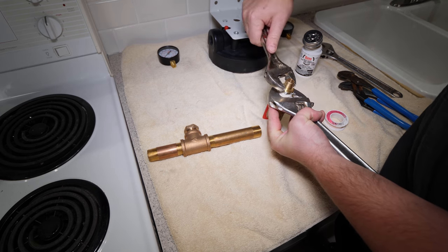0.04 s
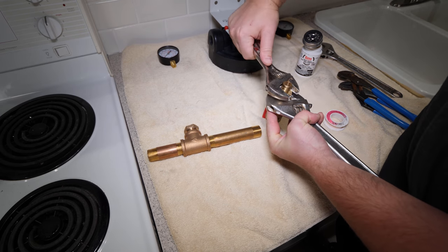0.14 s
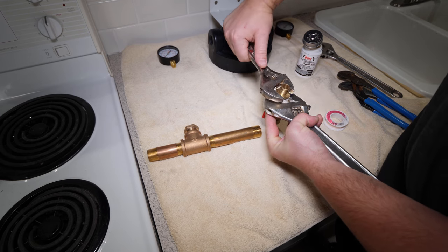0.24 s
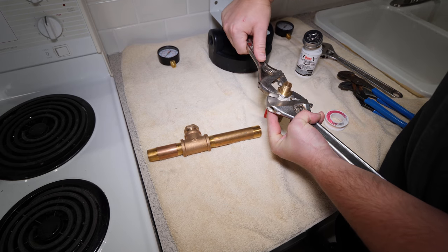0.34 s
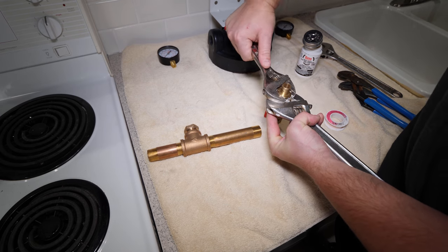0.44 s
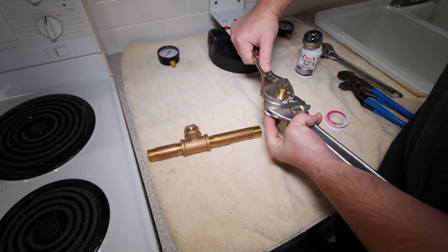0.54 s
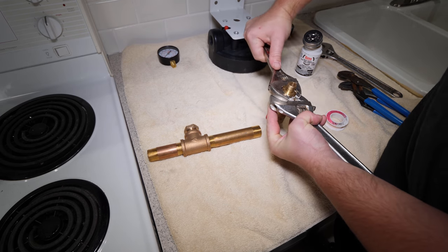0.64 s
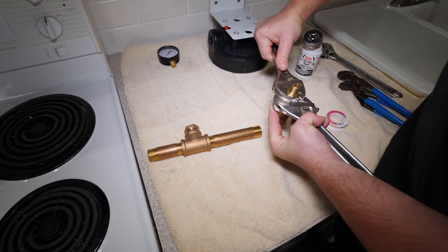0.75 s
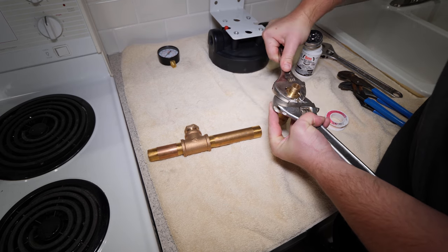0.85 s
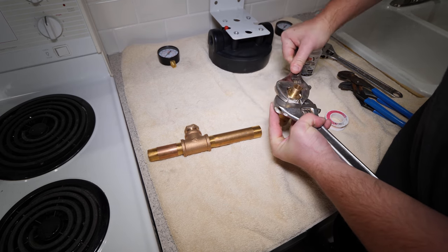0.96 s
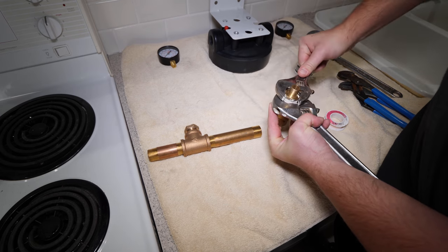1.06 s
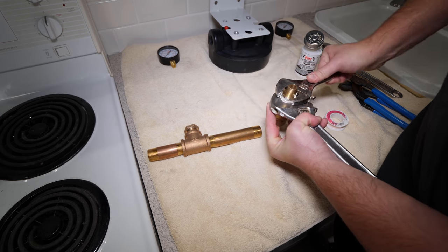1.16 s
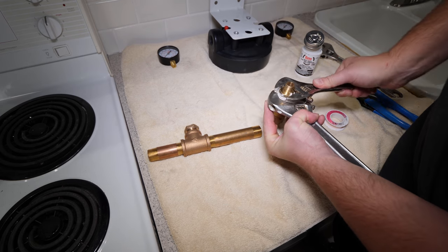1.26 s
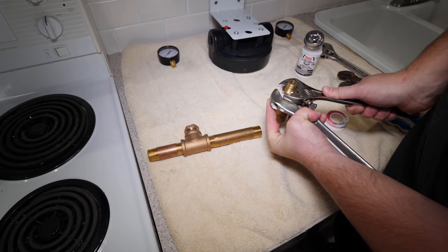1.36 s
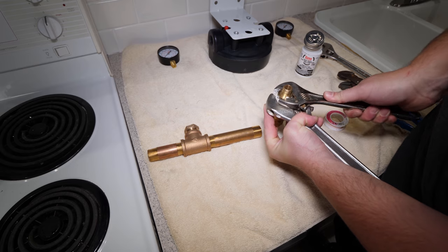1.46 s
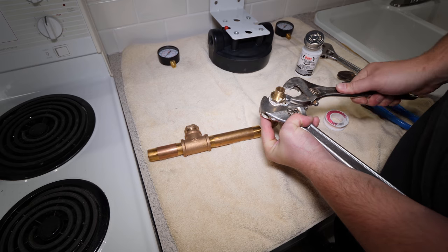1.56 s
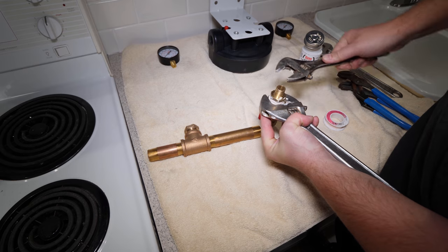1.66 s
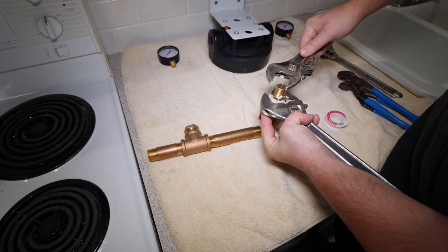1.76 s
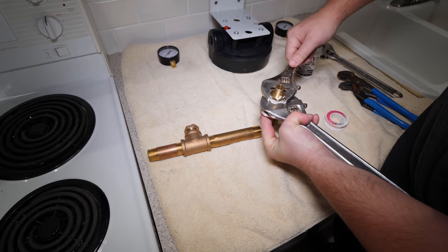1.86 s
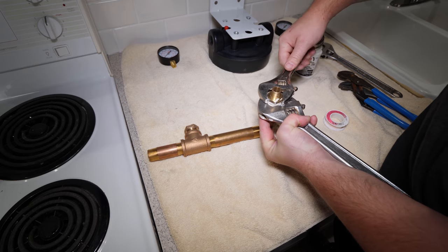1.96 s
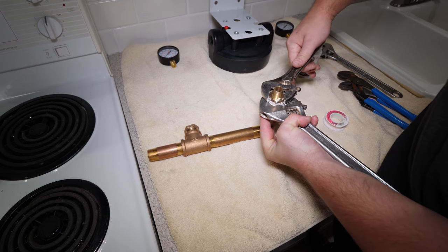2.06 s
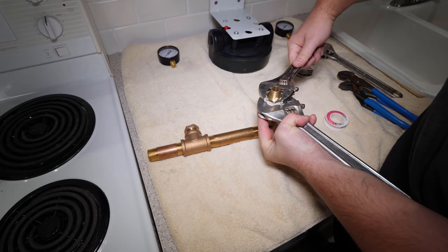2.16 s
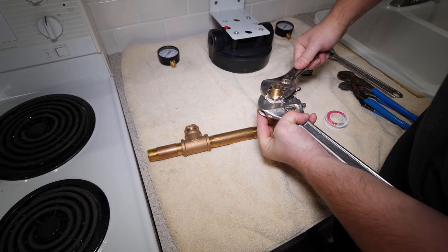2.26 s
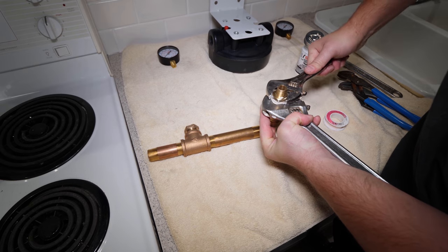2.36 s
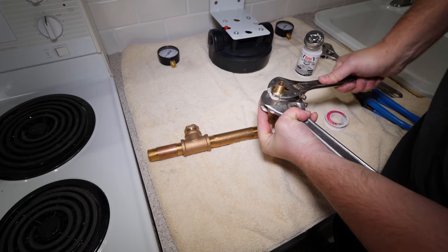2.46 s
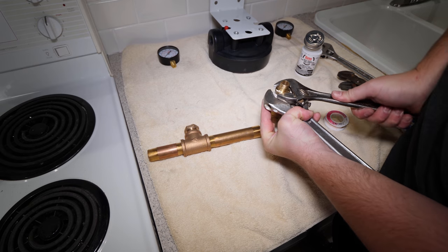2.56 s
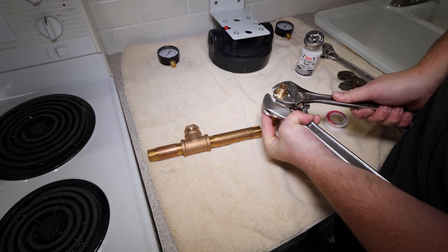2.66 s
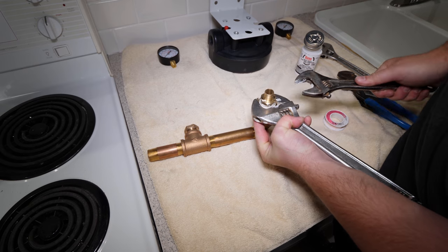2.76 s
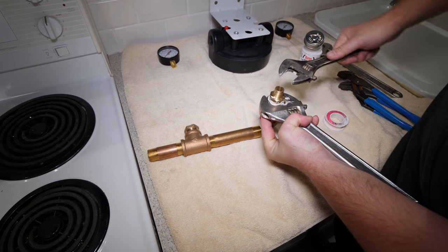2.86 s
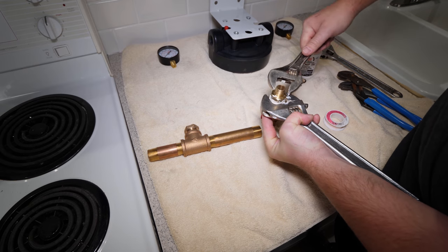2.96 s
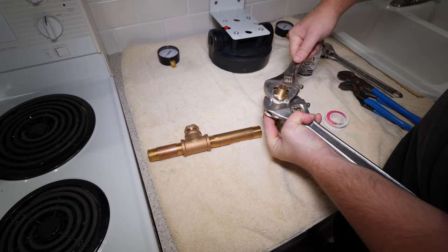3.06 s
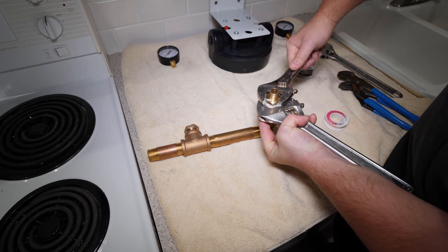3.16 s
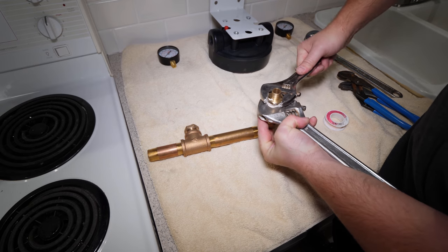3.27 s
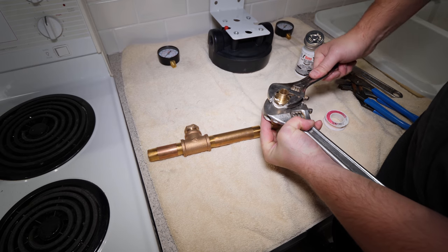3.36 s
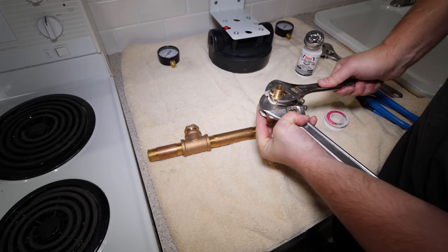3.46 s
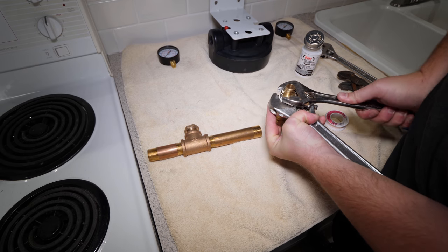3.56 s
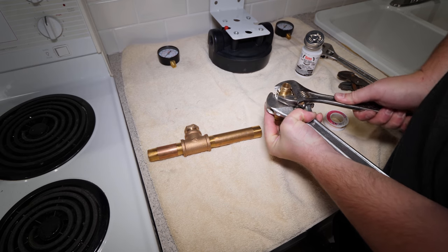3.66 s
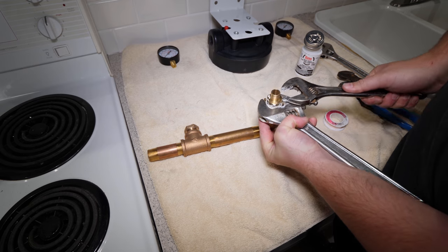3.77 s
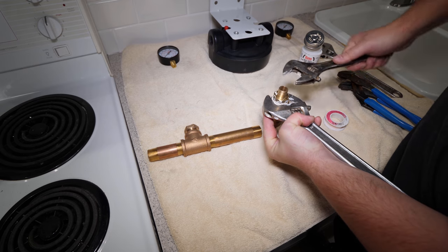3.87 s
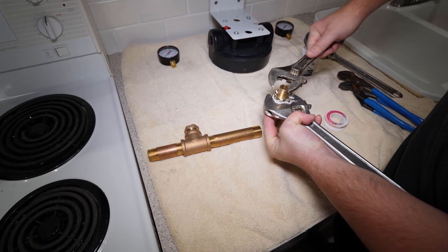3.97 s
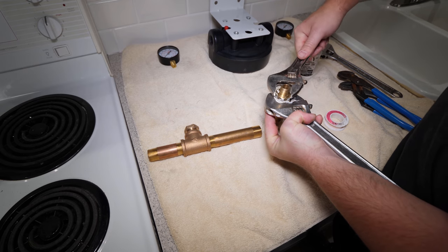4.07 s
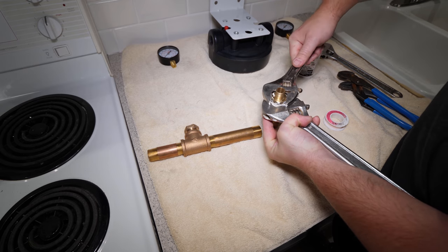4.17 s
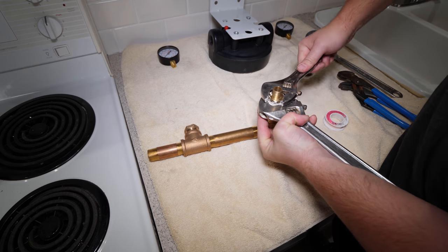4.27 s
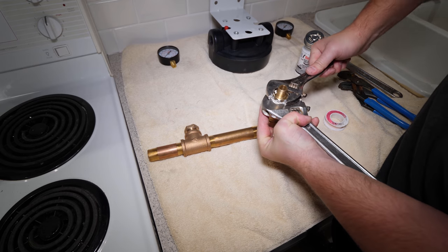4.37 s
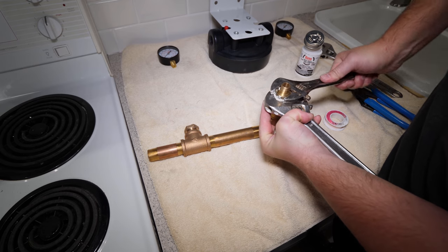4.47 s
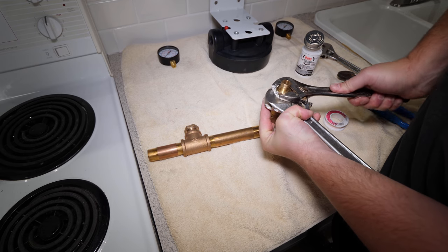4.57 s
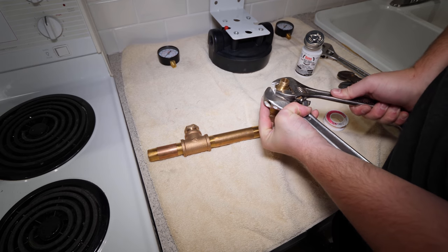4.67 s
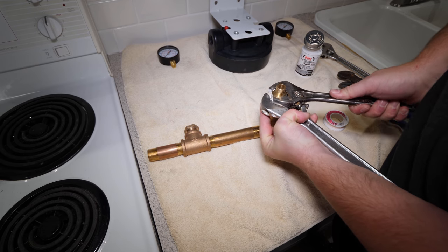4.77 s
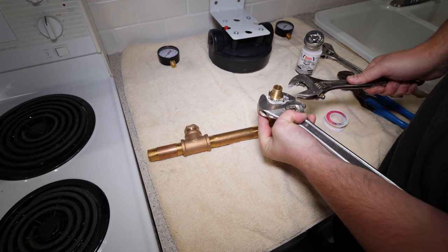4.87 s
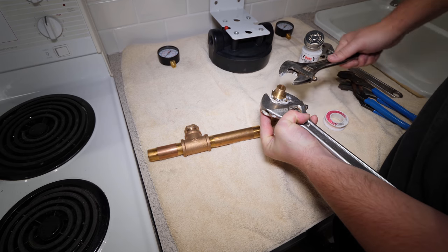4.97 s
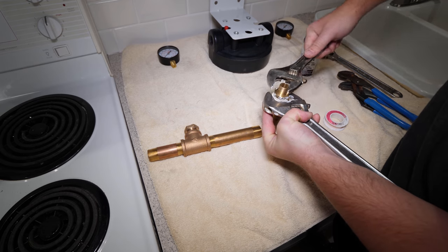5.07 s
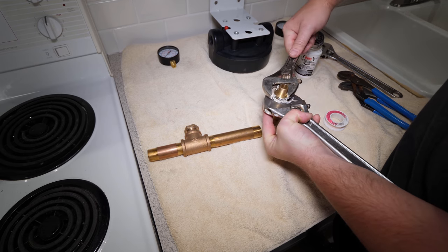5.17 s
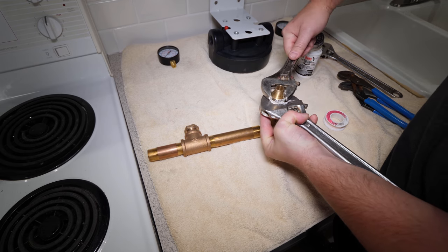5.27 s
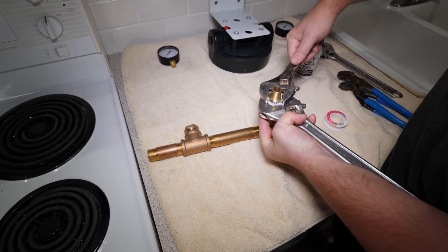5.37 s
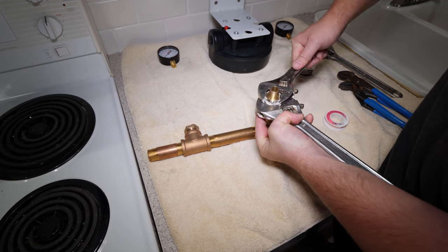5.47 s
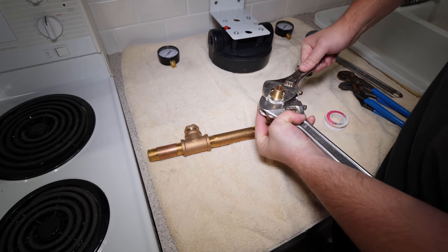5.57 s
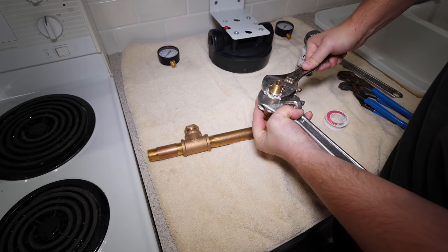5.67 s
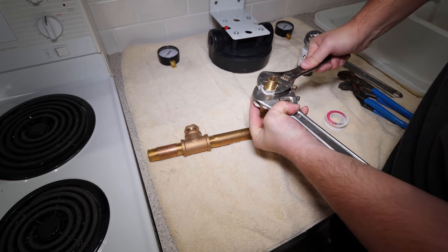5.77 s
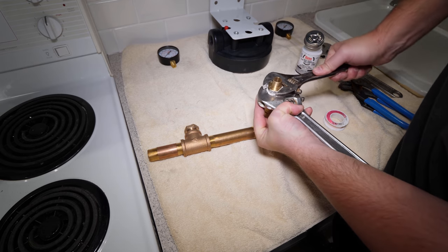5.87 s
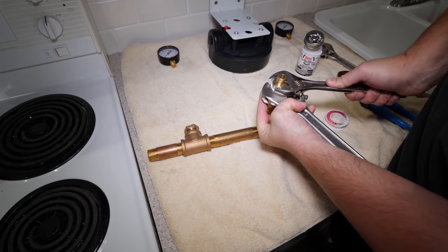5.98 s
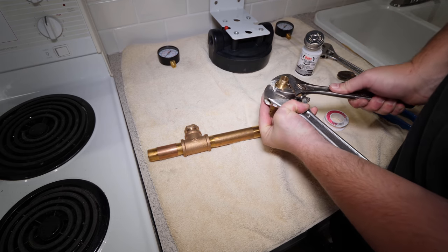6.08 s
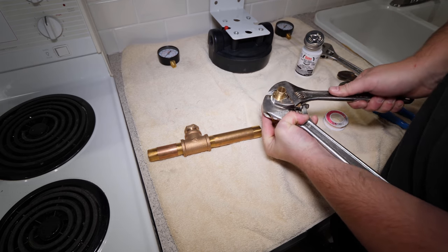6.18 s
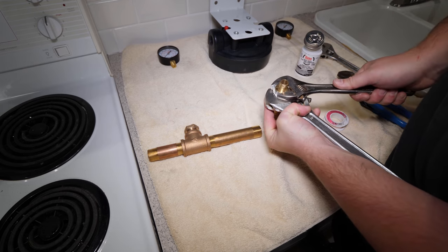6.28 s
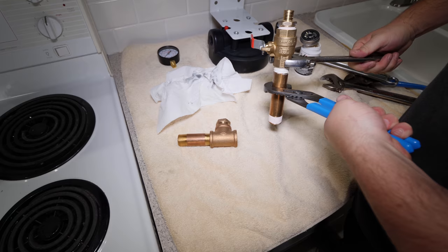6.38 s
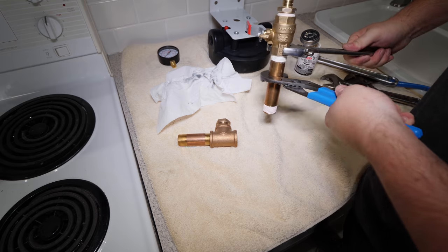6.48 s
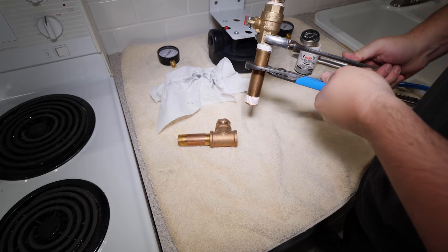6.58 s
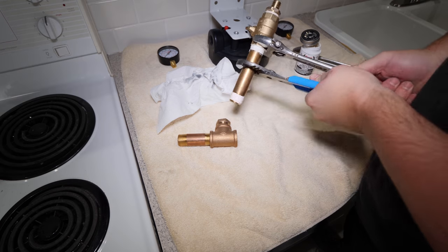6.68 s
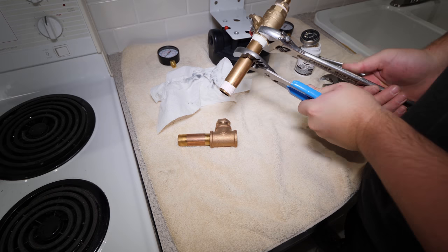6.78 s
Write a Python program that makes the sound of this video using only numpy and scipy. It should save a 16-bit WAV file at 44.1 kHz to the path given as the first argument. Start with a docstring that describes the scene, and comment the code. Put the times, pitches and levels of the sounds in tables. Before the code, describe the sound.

Close stereo microphone in a small tiled kitchen. A steel wrench is seated on a brass fitting held in pliers, turned and lifted off again and again. Clusters of hard, short clacks and bright clicks alternate with near-quiet moments of faint metal rubbing. Dull bumps through a towel and hollow knocks accompany them. The loudest hits bring a quick, squeezed room echo. Soft room hiss and a low hum continue beneath, and the last seconds are almost still.

```python
"""An adjustable wrench is set on a brass fitting held in pliers over a towel, turned, and lifted off, again and again.
Each touch of jaw on brass is a short noise crack that rings the hand-damped steel as dying tones; the turns are
tiny slips feeding drifting resonances. Bumps, a humming handle and one free clink go with them in a tiled kitchen.
Room tone and a low drone lie behind. A close stereo microphone with a fast limiter squeezes the hardest blows,
so their echo swells just after them; some blows add a short overload tick."""
import sys
import numpy as np
from scipy import signal
from scipy.io import wavfile
from scipy.ndimage import uniform_filter1d

SR = 44100
rng = np.random.default_rng(int(sys.argv[2]) if len(sys.argv) > 2 else 0)


def unload_audio(sound):
    """Save the sound as a 16-bit wav file, at the path given as the first command line argument."""
    columns = np.transpose(np.atleast_2d(sound))
    # keep every value between -1 and 1, then stretch to whole-number steps
    steps = np.round(np.clip(columns, -1, 1) * 32767)
    wavfile.write(sys.argv[1], SR, steps.astype(np.int16))


N = 301203  # length in samples

# The loose sliding jaw. Each row: mode in Hz, relative level in dB, 60 dB decay in s.
JAW_MODES = [(2570, 0.5, 0.013), (2655, -0.5, 0.013)]


def gain_of(db):
    """Decibels to a factor."""
    return 10 ** (np.asarray(db) / 20)


def evened(x):
    """Scales to rms 1."""
    return x / np.sqrt(np.mean(x ** 2) + 1e-20)


def peaked(x):
    """Scales each row to peak 1."""
    return x / abs(x).max(-1, keepdims=True)


def read(points, hz):
    """Reads a curve over frequency on a log axis."""
    f, value = np.transpose(points)
    return np.interp(np.log(hz + 1), np.log(f + 1), value)


def add(mix, s, sound):
    """Mixes a sound in at a time in seconds."""
    part = mix[round(s * SR):][:len(sound)]
    part += sound[:len(part)]


def band(x, lo_hz, hi_hz):
    """Causal band-pass."""
    edges = [lo_hz, min(hi_hz, SR / 2.1)]
    return signal.sosfilt(signal.butter(N=2, Wn=edges, btype="band", fs=SR, output="sos"), x)


def resonate(x, hz, width):
    """A resonance that may glide: shifts the curve hz down to zero, smooths, and shifts back."""
    turn = np.exp(2j * np.pi * np.cumsum(hz * np.ones(len(x))) / SR)
    r = np.exp(-np.pi * width / SR)
    return 2 * (turn * signal.lfilter([1 - r], [1, -r], x / turn)).real


def rings(modes, t, share_db, chance, detune=0.026):
    """Dying tones; each new grip shifts them a little and starts them in another phase."""
    hz, db, t60 = np.transpose(modes)[:, :, None]
    shift, phase = chance[:, :len(modes), None]
    tones = np.sin(2 * np.pi * (hz * (1 + detune * (shift - .5)) * t + phase))
    dying = gain_of(db + share_db - 60 * t / t60) * tones
    return peaked(dying.sum(0) * np.minimum(t / 0.00016, 1))


def air():
    """Room tone: stereo noise shaped in short spectra, with patches of level drifting over time and pitch."""
    # Room tone spectrum. Each row: Hz, relative density in dB per Hz.
    spectrum = [(35, -88.5), (60, -53.5), (246, -17.5), (403, -12.5), (659, -9.5), (777, -10.5), (983, -14),
                (1370, -22), (1500, -16.5), (4120, -23), (14300, -27), (16500, -32)]
    # Likeness of the two sides. Each row: Hz, correlation from 0 to 1.
    likeness = [(100, 1), (900, 0.97), (3800, 0.1), (15000, 0.95)]
    frames, hz = N // 256 + 5, np.fft.rfftfreq(1024, 1 / SR)
    a, b, c, d, patches = rng.standard_normal((frames, 513, 5)).T
    patches = evened(uniform_filter1d(uniform_filter1d(patches, 12, 0), 14, 1))
    same = np.clip(read(likeness, hz), -1, 1)[:, None]
    left = a + 1j * b
    right = same * left + np.sqrt(1 - same ** 2) * (c + 1j * d)
    z = np.array([left, right]) * gain_of(read(spectrum, hz)[:, None] + 1.5 * patches)
    return gain_of(-68) * evened(signal.istft(z, nperseg=1024, noverlap=768)[1][:, :N])


def drone():
    """A steady appliance drone: noise through one low resonance."""
    # The drone: Hz, width in Hz, level in dB.
    hz, width, db = (180, 24, -82)
    return gain_of(db) * evened(resonate(rng.standard_normal(N), hz, width))


def kitchen(x):
    """Sparse reflections of random sign that build up, each band dying at its own speed; mostly common to both sides."""
    # Decay of the room. Each row: Hz, 60 dB decay in s.
    decay = [(250, 0.51), (1000, 0.64), (3000, 0.38), (8000, 0.44), (15000, 0.14)]
    wide, build_s = 0.31, 0.00091
    taps = np.zeros((2, 26000))
    at = np.arange(180, 25980, 20) + rng.integers(0, 20, (2, 1290))  # one in every 20 samples
    np.put_along_axis(taps, at, rng.choice([-1., 1.], at.shape), 1)
    hz, t, z = signal.stft(taps, SR, nperseg=256)
    z *= gain_of(-60 * t / read(decay, hz)[:, None]) * (1 - np.exp(-t / build_s))
    mid, side = signal.istft(z, SR, nperseg=256)[1]
    tail = np.array([mid + wide * side, mid - wide * side]) / np.linalg.norm(mid)
    return signal.oaconvolve(x[None], tail, axes=1)[:, :N]


def press():
    """Dull bumps through the towel: low bands of dying noise."""
    # Hands and tools bumping the padded counter. Each row: start in seconds, level in dB.
    thumps = [(0.053, -50), (0.139, -35.5), (0.293, -41.5), (0.445, -40.5), (0.598, -53), (0.972, -56),
              (1.982, -49), (2.027, -45.5), (2.506, -54), (2.737, -49.5), (3.119, -45), (3.215, -50),
              (3.296, -56.5), (4.26, -44), (4.841, -59), (5.189, -50), (5.278, -53), (5.438, -52),
              (6.194, -61)]
    mix, t = np.zeros(N), np.arange(round(.3 * SR)) / SR
    noise = rng.standard_normal((len(thumps), len(t)))
    bumps = noise * gain_of(-60 * t / 0.1) * np.minimum(t / 0.0075, 1)
    for (s, db), bump in zip(thumps, peaked(band(band(bumps, 160, 360), 120, 420))):
        add(mix, s, gain_of(db) * bump)
    return mix


def handle():
    """The long handle flexes when knocked: a soft tap excites a broad low resonance over a rough scuff."""
    # Knocks on the handle, pitched by the grip. Each row: start in seconds, level in dB, Hz.
    knocks = [(0.055, -51, 620), (0.1, -49, 624), (0.19, -45, 608), (0.28, -46, 633), (0.322, -31.5, 637),
              (0.336, -29.5, 600), (0.455, -44, 616), (0.523, -44, 652), (0.856, -47, 670),
              (0.958, -55.5, 606), (2.028, -47, 620)]
    # The handle: width in Hz of the first of two resonances, 60 dB decay of the tap in s.
    width, t60 = (82, 0.087)
    mix, t = np.zeros(N), np.arange(round(.2 * SR)) / SR
    for s, db, hz in knocks:
        scuff = rng.standard_normal(len(t)) * gain_of(-60 * t / t60) * np.minimum(t / 0.0019, 1)
        hum = peaked(resonate(resonate(scuff, hz, width), hz, 2 * width))
        rough = peaked(band(scuff, 180, 3000))
        add(mix, s, gain_of(db) * peaked(hum + 0.28 * rough))
    return mix


def rock():
    """The fitting rocks in the pliers with a short hollow knock: one dying low tone each."""
    # Rocking knocks. Each row: start in seconds, level in dB, Hz.
    hollow = [(0.356, -32.5, 800), (2.285, -42.5, 923), (4.019, -35, 890), (5.276, -39.5, 940),
              (6.711, -54.5, 965)]
    mix, t = np.zeros(N), np.arange(round(0.055 * SR)) / SR
    for s, db, hz in hollow:
        tone = np.sin(2 * np.pi * hz * t) * np.minimum(t / 0.00064, 1)
        add(mix, s, gain_of(db - 60 * t / 0.032) * tone)
    return mix


def rattle():
    """Small uneven taps keep the loose jaw ringing while the wrench is carried over."""
    # Rattles. Each row: start in seconds, end of the taps in seconds, level in dB.
    spells = [(0.094, 0.17, -51), (5.121, 5.159, -51), (5.208, 5.297, -56)]
    mix, t = np.zeros(N), np.arange(round(0.031 * SR)) / SR
    for start, end, db in spells:
        count = round((end - start) * SR)
        hits = rng.random(count) < 900 / SR  # about 900 taps a second
        taps = rng.standard_normal(count) * hits * signal.windows.tukey(count, .5)
        ring = rings(JAW_MODES, t, 0, rng.random((2, len(JAW_MODES))))
        add(mix, start, gain_of(db) * evened(signal.fftconvolve(taps, ring)))
    return mix


def clink():
    """The wrench slips off and rings freely, once: clear tones with a rough fringe, each dying at its own speed."""
    # The clink: start in seconds, level in dB.
    start, clink_db = (1.076, -16)
    # The free wrench. Each row: mode in Hz, relative level in dB, 60 dB decay in s.
    modes = [(2190, -6, 0.018), (4060, -10, .025), (4440, 3, 0.024), (5030, -27, 0.9), (5100, -6, .022),
             (5400, -6, 0.025), (5775, -2, 0.028), (6280, -7, .025), (7200, -10, 0.03), (7760, -6, 0.035),
             (7960, -8, 0.03), (11390, -12, 0.03), (14020, -11, 0.035)]
    blur_hz = 130  # the loose parts buzz, so each mode also sounds as a rough band
    mix, t = np.zeros(N), np.arange(round(.5 * SR)) / SR
    buzz = rng.standard_normal((len(modes), len(t) + 2000))  # 2000 samples let the resonances settle
    fringe = np.zeros(len(t))
    for noise, (hz, db, t60) in zip(buzz, modes):
        rough = evened(resonate(resonate(noise, hz, blur_hz), hz, blur_hz))[-len(t):]
        fringe += rough * gain_of(db - 60 * t / t60)
    fringe = peaked(fringe * np.minimum(t / 0.00045, 1))
    clean = rings(modes, t, 0, rng.random((2, len(modes))), detune=0)
    add(mix, start, gain_of(clink_db) * peaked(clean + 0.6 * fringe))
    return mix


def slide():
    """Dense tiny slips of steel on brass feed resonances that drift as the wrench turns."""
    # Turns, jaws rubbing on brass. Each row: start, hardest moment and end in seconds, level in dB,
    # Hz of the leading resonance at the start, and from the hardest moment on.
    turns = [(0.05, 0.06, 0.33, -55.5, 2600, 2620), (2.406, 2.498, 2.62, -57, 3800, 3800),
             (2.764, 2.822, 2.9, -67, 2630, 3100), (3.419, 3.459, 3.52, -53, 3160, 4180),
             (3.469, 3.526, 3.65, -53.5, 4090, 4130), (4.467, 4.527, 4.68, -64, 4300, 4300),
             (5.789, 5.903, 6.37, -72.5, 2520, 2610), (6.688, 6.77, 6.83, -66.5, 5570, 5450)]
    # The gripped fitting. Each row: resonance in Hz before its drift, width in Hz, mean level in dB.
    fitting = [(2170, 370, -2.5), (3540, 69, 0), (4300, 220, 0.5), (5440, 140, 0), (5600, 140, -5),
               (7700, 120, -7), (8500, 110, -1.5), (9500, 210, -15)]
    squeal_db = 6  # the leading resonance over a 0 dB one
    grip_db, ease_db = -13, -14  # a turn starts and ends this far under its hardest moment
    mix = np.zeros(N)
    for start, hardest, end, db, from_hz, to_hz in turns:
        t = np.arange(start, end, 1 / SR)
        sizes = gain_of(1.5 * rng.exponential(1, len(t))) * rng.standard_normal(len(t))
        slips = sizes * (rng.random(len(t)) < 5000 / SR)  # about 5000 slips a second
        rung = 0.73 * evened(band(slips, 1800, 16000))
        for hz, width, mode_db in fitting:
            a, b, c = rng.random(3)
            drift = 1 + 0.091 * (a - .5) + 0.18 * (t - hardest)  # tightening lifts the pitch
            # the grip comes and goes, 4 to 10 times a second
            bite = gain_of(mode_db + 21.0 * np.sin(2 * np.pi * ((4 + 6 * b) * t + c)))
            rung = rung + bite * evened(resonate(slips, hz * drift, width))
        lead_hz = np.interp(t, [start, hardest], [from_hz, to_hz])
        squeal = evened(resonate(resonate(slips, lead_hz, 300), lead_hz, 300))
        rung = rung + gain_of(squeal_db) * squeal
        effort_db = db + np.interp(t, [start, hardest, end], [grip_db, 0, ease_db])
        add(mix, start, gain_of(effort_db) * evened(rung) * signal.windows.tukey(len(t), .15))
    return mix


def blows():
    """Each touch: a crack, a blurred ring where the jaw lands, the tool's modes, the loose jaw and a low knock."""
    # Jaw touches. Each row: time in seconds, level in dB, Hz of the contact ring,
    # treble in dB against the mids of the crack, jaw ring in dB against the same.
    touches = [(0.0337, -37, 2480, -20, -8), (0.0552, -28.5, 4880, 2, 1.5), (0.1387, -6.5, 2535, 0, 11),
               (0.15, -24, 4830, -3, -3), (0.1596, -6.5, 11500, -6.5, 10), (0.2879, -32.5, 2590, -23, 9.5),
               (0.3387, -28.5, 2680, -15.5, -21.5), (0.355, 11, 3500, 1.5, -17),
               (0.4498, -7.5, 4990, -4, -20), (0.4894, -19.5, 2795, -8.5, -32),
               (0.4942, -22.5, 5220, -14.5, -15), (0.9717, -51.5, 5060, 0, -2.5),
               (1.0768, -32.5, 4410, -0.5, -35), (1.564, -46, 5240, -3.5, -28),
               (1.6135, -5.5, 3260, 11, -37.5), (1.6205, -19, 7200, -16, -25.5),
               (1.632, -25.5, 4800, -13, -23), (1.6435, -20.5, 7400, 4, -15),
               (1.648, -25, 4900, -19, -14.5), (1.8225, -25, 7300, -13, -25), (1.8258, -11, 5030, 8.5, -32),
               (1.8351, -12.5, 4800, 3, -19), (1.8405, -24.5, 4920, -3, -22), (1.8772, -2, 5600, 2.5, -12),
               (1.8894, -14.5, 3690, -1.5, 3.5), (1.8937, -10.5, 5320, -11.5, -0.5),
               (1.9073, -23, 5600, -17, -45), (1.942, -22.5, 4740, -20, -16),
               (1.9836, -15.5, 5730, 7.5, -18), (1.9978, -20, 12840, -12.5, -28),
               (2.2854, -23, 4300, -1.5, 11), (2.401, -41, 3780, -24, -29), (2.4978, -40, 3740, -21, -27),
               (2.515, -44, 4800, -20, -17.5), (2.5795, -37, 5600, -4, -12), (2.596, -39, 7700, 1.5, -20),
               (2.7257, -44.5, 12900, -2, -35), (2.752, -34, 2680, -13.5, 8),
               (2.9008, -38.5, 10500, -16, -8), (2.9286, -21.5, 2700, 8, 7), (2.991, -18, 11500, 3, -5.5),
               (3.0086, -1.5, 11200, 1.5, 1), (3.041, -10.5, 2550, 11, 2), (3.0827, 1, 11240, 1.5, -7.5),
               (3.0888, -14.5, 11400, 6, -20), (3.113, -13.5, 2570, -16, 6.5), (3.117, -19, 3710, -27, -7),
               (3.22, -35.5, 3020, -9, -8), (3.4334, -30.5, 3560, -17, -12.5),
               (3.5415, -35, 4040, -23, -39.5), (3.773, -35.5, 2610, -6.5, 12),
               (3.7967, -32.5, 2580, -21, 12.5), (3.937, -38, 2620, -4, 6), (3.9477, -23, 2534, 0.5, -1),
               (4.0178, -7, 2540, 5.5, 1), (4.0245, -10.5, 11700, 11, -2.5),
               (4.0694, -15.5, 5120, -11, -11), (4.0857, -23, 2570, 0, 4), (4.1376, -25, 2690, -10, -8.5),
               (4.1396, -10, 2628, -1, -2.5), (4.2591, -18.5, 3680, 6, -26), (4.4912, -46.5, 4230, 1, 4),
               (4.8449, -34.5, 2600, -5, 20), (4.8725, -37.5, 2620, -27, 12), (4.8983, -17, 3130, 7, -15),
               (4.9045, -27, 3010, 9.5, 10), (4.911, -23.5, 4880, -17, -18), (4.9291, -26.5, 2480, -13, 10),
               (5.0925, -23.5, 3200, -3, -5), (5.183, -22, 2500, -13.5, 5), (5.208, -42.5, 2470, -6, -8.5),
               (5.2759, -15, 4910, 3, -4.5), (5.2845, -22.5, 2530, -18, 6), (5.337, -10.5, 10150, -7.5, 5),
               (5.4189, 1.5, 3760, 3, -20), (5.4221, -5.5, 11400, 5.5, -17.5),
               (6.711, -53, 2830, -1.5, -16.5), (6.749, -58, 3440, -14, -24), (6.8148, -49, 3100, -20, -27),
               (6.8237, -38.5, 3210, -11, -25)]
    # Hand-damped wrench and pliers. Each row: mode in Hz before detuning, relative level in dB, 60 dB decay in s.
    steel = [(1607, 6, 0.032), (3263, 1.5, 0.045), (4830, 5, 0.035), (5260, 3.5, 0.025), (5780, -7, 0.072),
             (7200, -6, 0.09), (7830, 1, 0.054), (9400, -2.5, 0.034), (10150, -2.5, 0.04),
             (11500, 2.5, 0.07), (13400, -7.5, 0.018)]
    knock_db, knock_growth = -27, 0.84  # knock under a 0 dB blow, and dB gained for each dB of blow
    mix, t = np.zeros(N), np.arange(round(.06 * SR)) / SR
    mode_hz = np.transpose(steel)[0][:, None]
    noise = rng.standard_normal((len(touches), len(t)))
    chances = rng.random((len(touches), 3, len(steel)))
    # the jaw chatters for a few ms
    bursts = noise * gain_of(-20 * (t / 0.0033) ** 0.56) * np.minimum(t / 0.0008, 1)
    bursts[:, 20] += 1.3  # one sharp tick within each chatter
    mids = peaked(band(band(bursts, 2200, 7000), 910, 7900))
    trebles = peaked(band(bursts, 9700, 13000))
    knocks = peaked(band(noise[:, ::-1] * gain_of(-60 * t / 0.013), 170, 1600))
    for k, (s, db, hz, treble_db, jaw_db) in enumerate(touches):
        crack = mids[k] + gain_of(treble_db) * trebles[k]
        contact = peaked(resonate(bursts[k], hz, 0.022 * hz))
        # the place of the blow favours modes near its own ring; those above 7 kHz follow its treble
        near_db = -30 * np.minimum(abs(np.log2(mode_hz / hz)), .7)
        share_db = near_db - 6 * chances[k, 2, :, None] + (mode_hz > 7000) * treble_db
        tool = rings(steel, t, share_db, chances[k, :2])
        loose = rings(JAW_MODES, t, 0, chances[k, :2], detune=.015)
        jaw = gain_of(jaw_db) * loose * np.minimum(t / .002, 1)  # the jaw answers late
        # the hardest blows wake so many modes that single ones stand out less
        ringing = gain_of(-.6 * max(db + 11.5, 0)) * (0.78 * contact + 0.51 * tool)
        blow = peaked((crack + ringing + jaw) * (1 - t / t[-1]))
        knock = gain_of(knock_db + knock_growth * db) * knocks[k]
        add(mix, s - .0003, gain_of(db) * blow + knock)
    return mix


def overload_ticks():
    """Overload ticks: on some blows the recorder clips into a short one-way pulse, uneven between the two channels."""
    # Overload ticks. Each row: time in seconds, level in dB before the uneven lean.
    overloads = [(0.355, -10.5), (1.6128, -24), (1.8785, -20), (3.0067, -32), (3.041, -28.5),
                 (3.083, -22.5), (4.0186, -29), (5.4189, -27)]
    mix, pulse = np.zeros((2, N)), np.hanning(round(0.00027 * SR) + 2)  # 0.27 ms long
    for (s, db), lean in zip(overloads, rng.choice([-1., 1.], len(overloads))):
        add(mix[0], s, gain_of(db + 2.8 * lean) * pulse)
        add(mix[1], s, gain_of(db - 1.7 * lean) * pulse)
    return mix


def scene():
    """Tools a little right of the microphone, their echo, the room tone and the drone."""
    tools = blows() + clink() + slide() + rattle() + rock() + handle() + press()
    # the counter top and the tiles answer first, about 2 ms late
    echo = gain_of([[-9], [-7]]) * np.array([np.roll(tools, 75), np.roll(tools, 92)])
    tail = gain_of(-13.5) * kitchen(tools)
    direct = tools * gain_of([[-1.2], [.8]])
    return direct + echo + tail + air() + drone()


def top_cut(x):
    """Nothing passes above the cut-off."""
    return signal.sosfilt(signal.butter(12, 16970, fs=SR, output="sos"), x)


def record(dry):
    """Bass roll-off, a limiter on each side that recovers in some tens of ms, overload ticks, soft clipping, band edge."""
    thin = signal.sosfilt(signal.butter(N=2, Wn=100, btype="high", fs=SR, output="sos"), dry)
    fall = np.arange(N) * 370.0 / SR  # recovery, 370 dB per second
    peak_db = 20 * np.log10(abs(thin) + 1e-9)
    held_db = np.maximum.accumulate(peak_db + fall, axis=1) - fall
    over_db = np.maximum(held_db + 14.0, 0)  # threshold -14 dB
    grab = np.exp(-1 / (.00006 * SR))  # grabs in 0.06 ms
    limited = thin / gain_of(0.81 * signal.lfilter([1 - grab], [1, -grab], over_db))
    full = 0.33 * np.tanh((limited + overload_ticks()) / 0.36)
    low_pass = signal.firwin(151, 16500, window=("kaiser", 7), fs=SR)
    edged = signal.oaconvolve(full, low_pass[None], "same")
    return top_cut(edged)


dry = scene()
out = record(dry)
unload_audio(out)
```